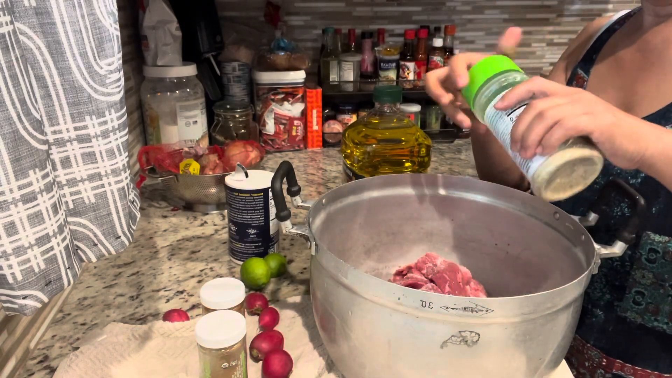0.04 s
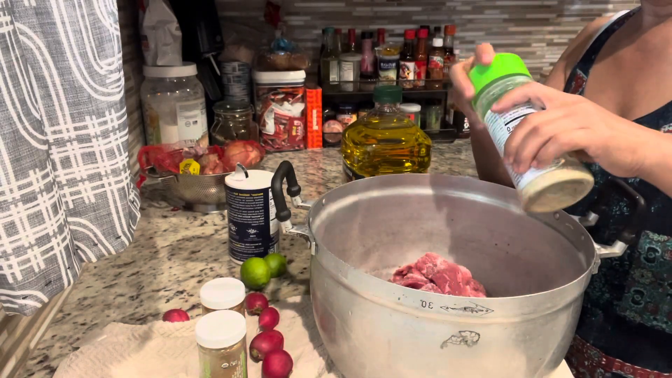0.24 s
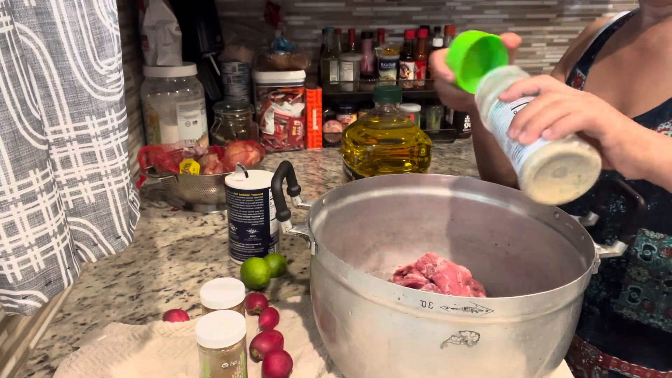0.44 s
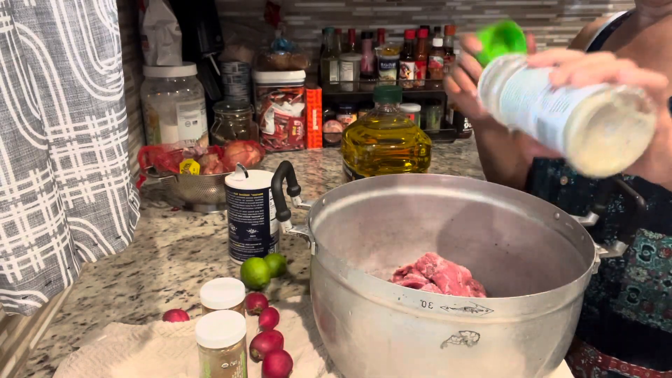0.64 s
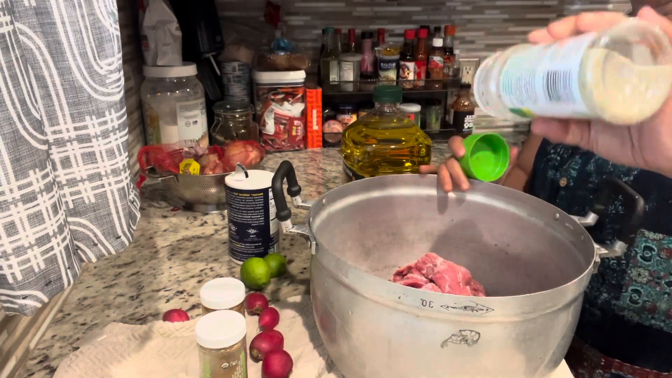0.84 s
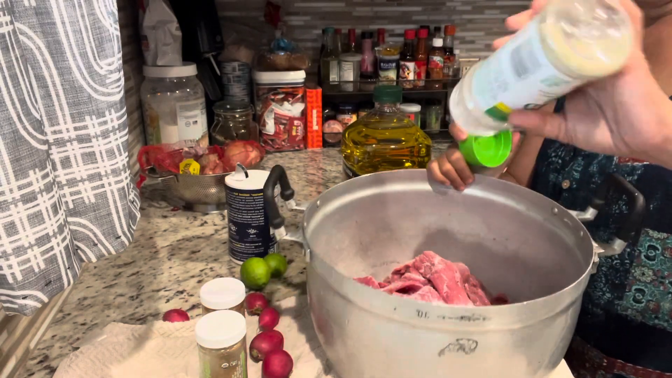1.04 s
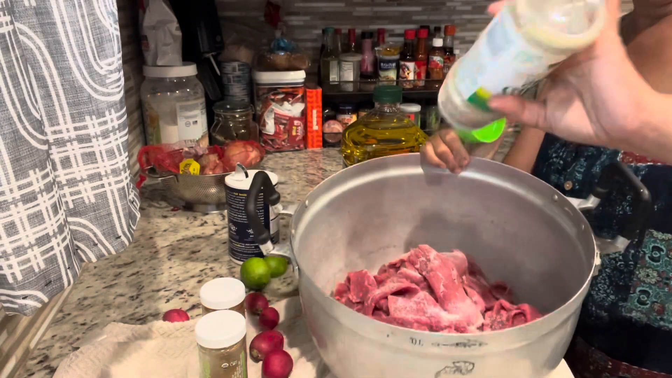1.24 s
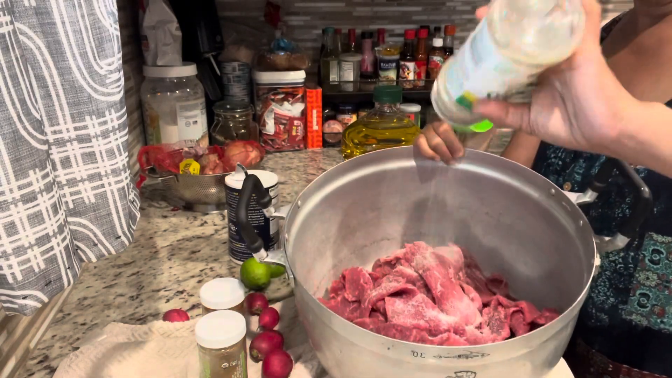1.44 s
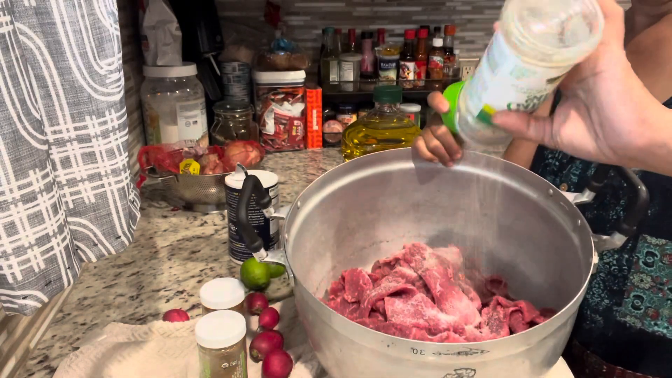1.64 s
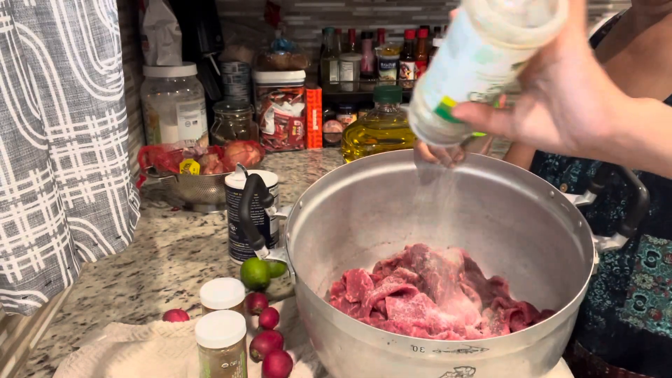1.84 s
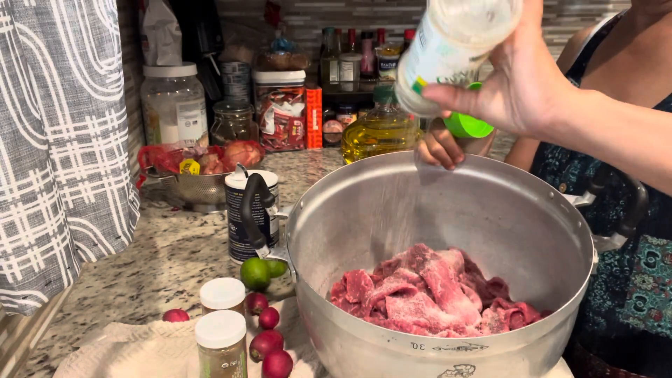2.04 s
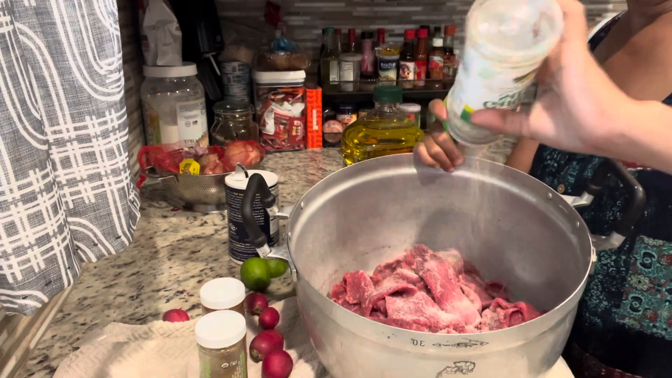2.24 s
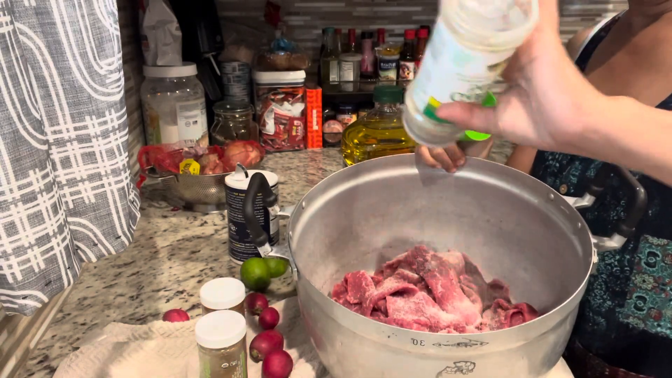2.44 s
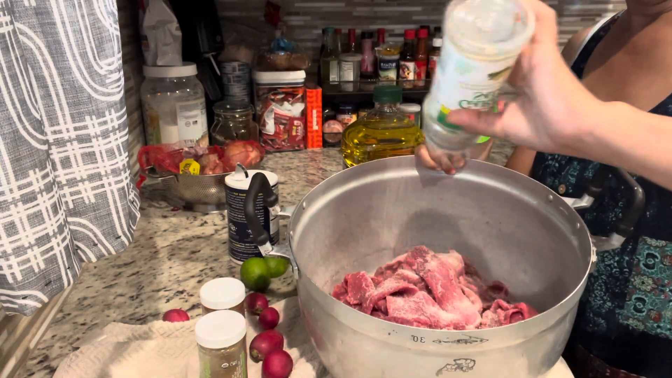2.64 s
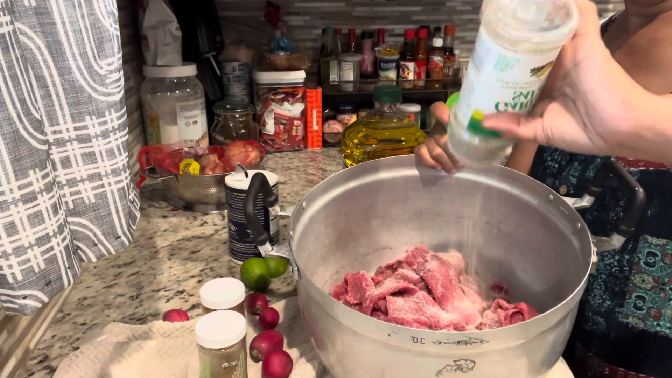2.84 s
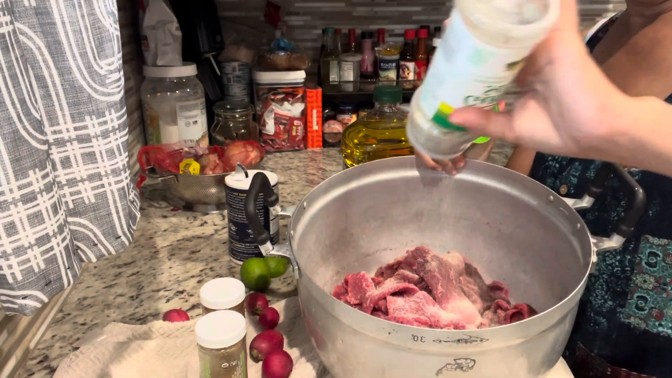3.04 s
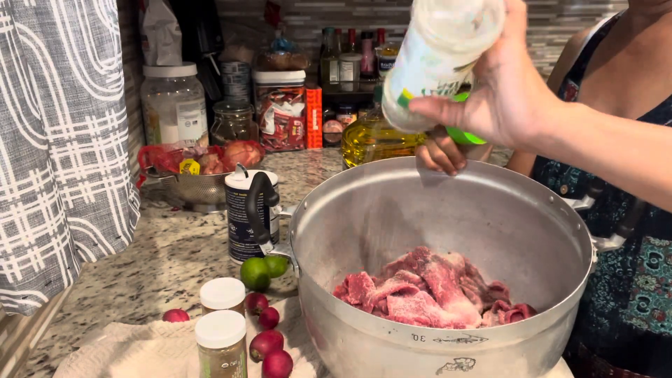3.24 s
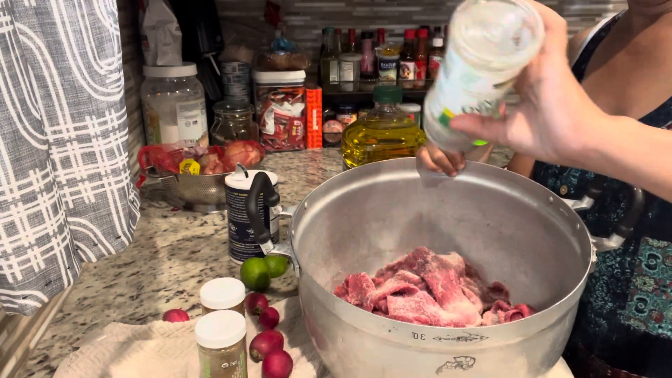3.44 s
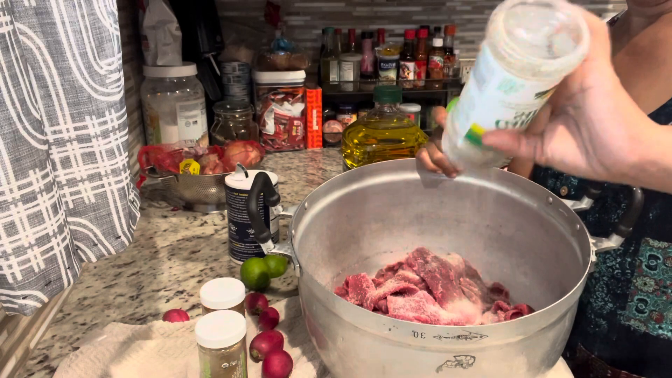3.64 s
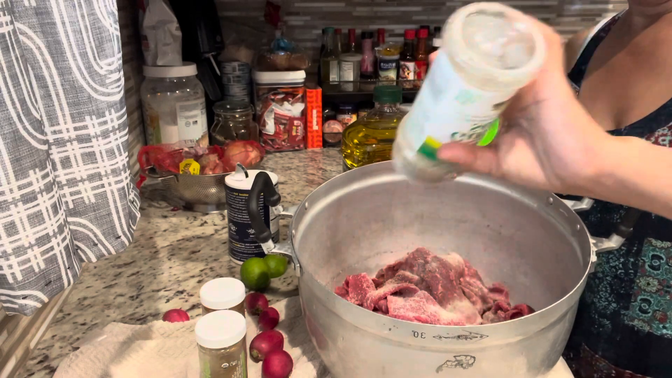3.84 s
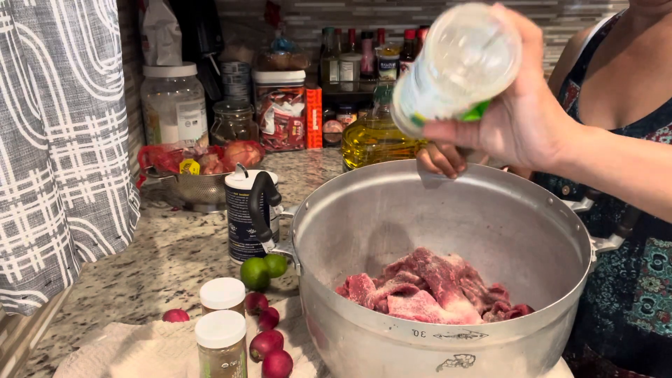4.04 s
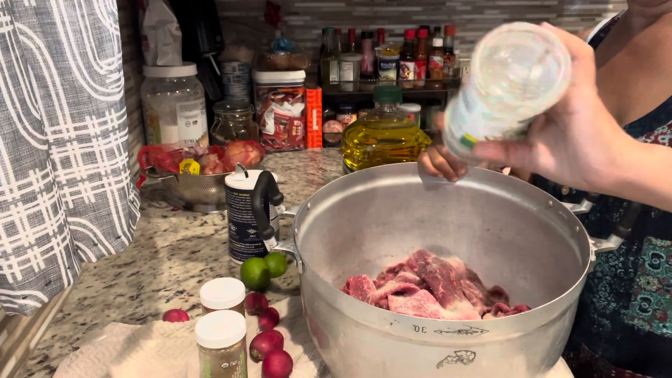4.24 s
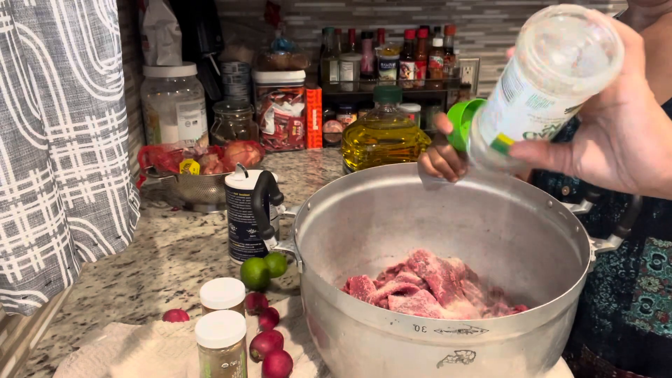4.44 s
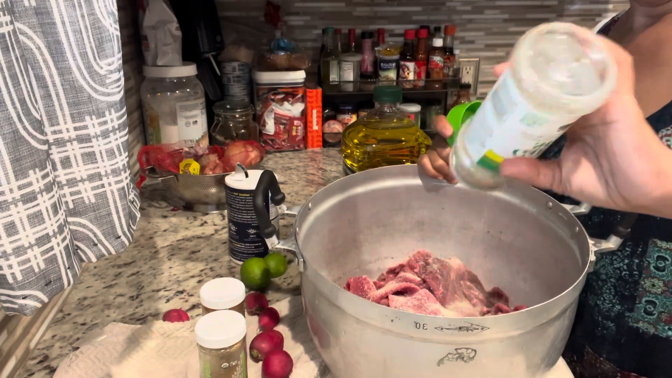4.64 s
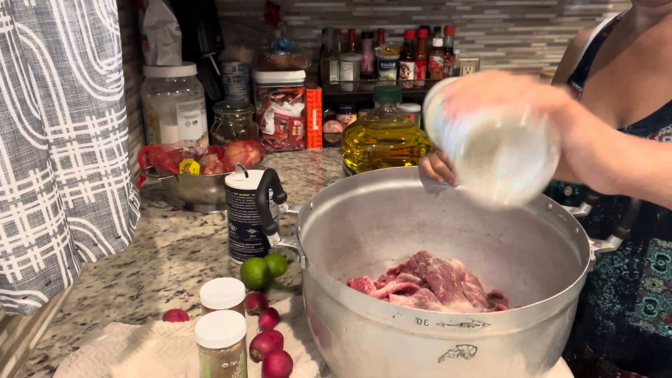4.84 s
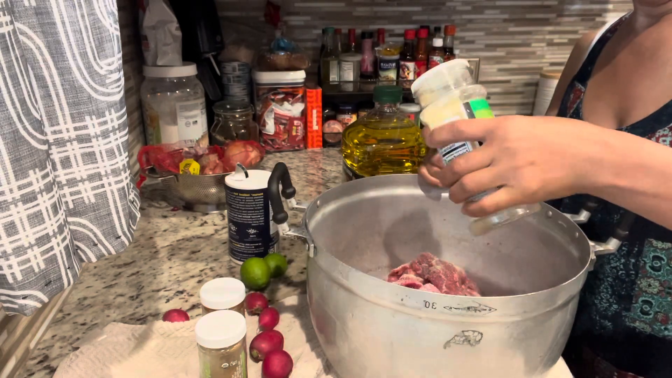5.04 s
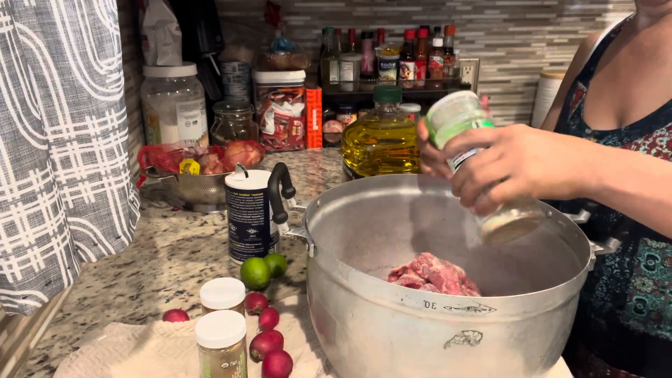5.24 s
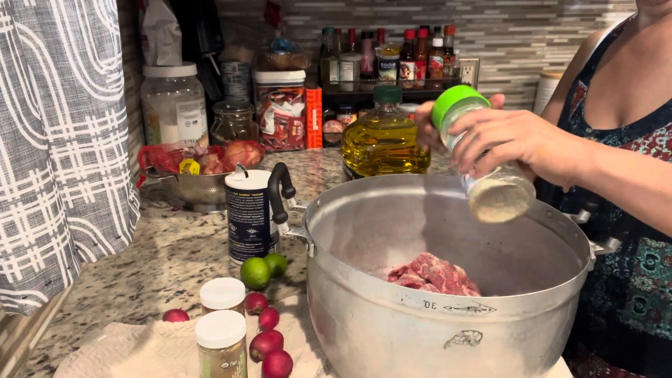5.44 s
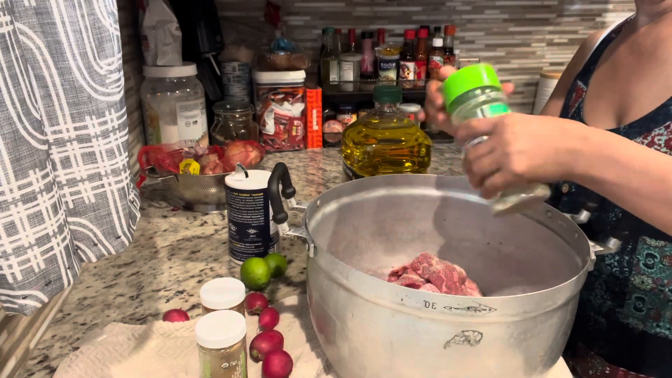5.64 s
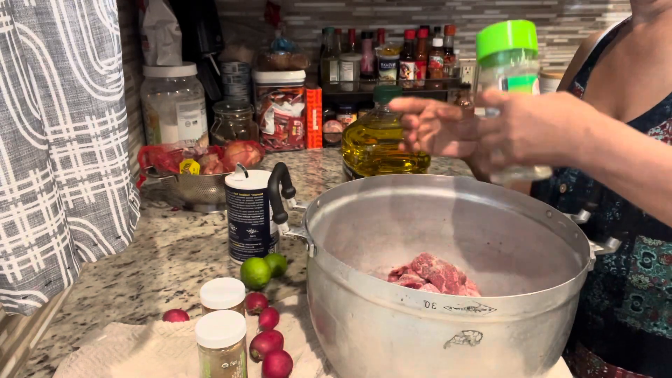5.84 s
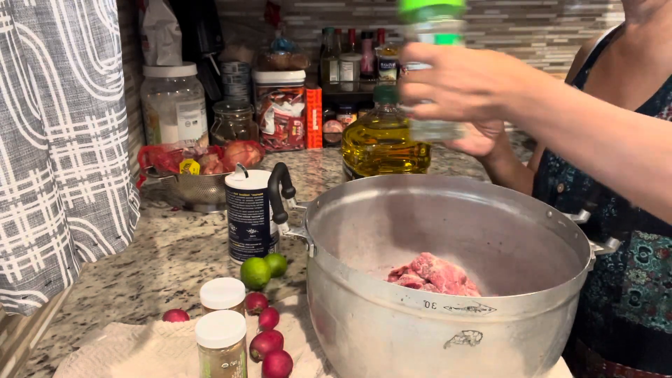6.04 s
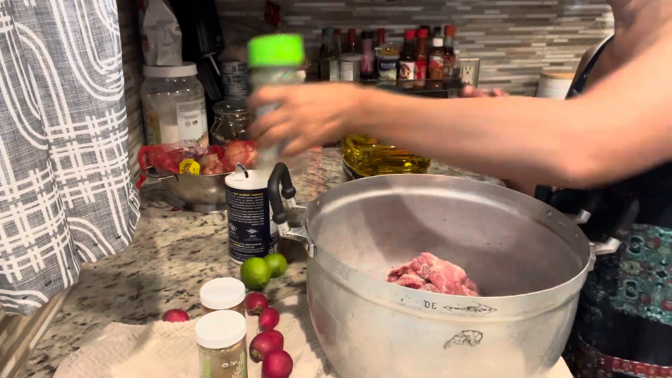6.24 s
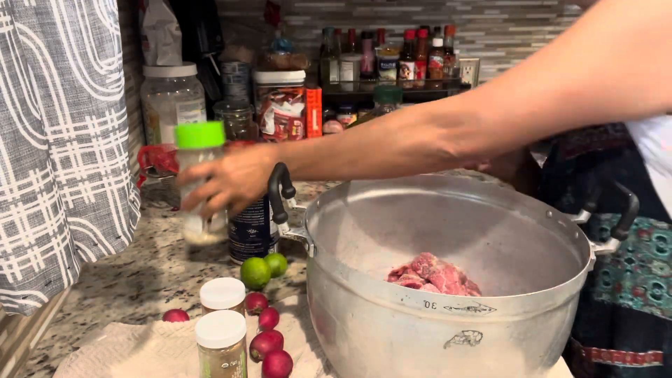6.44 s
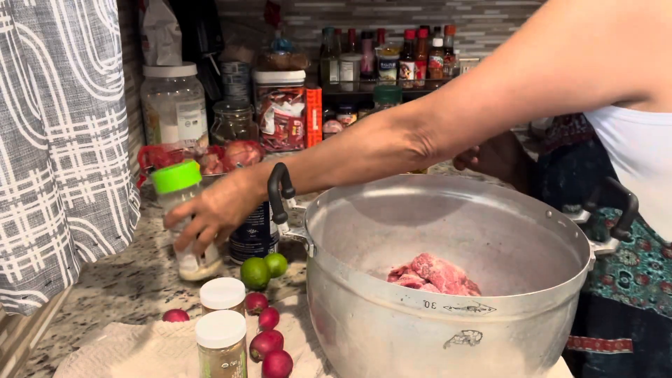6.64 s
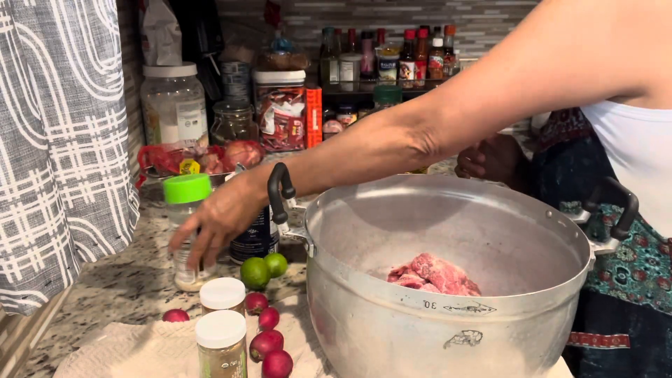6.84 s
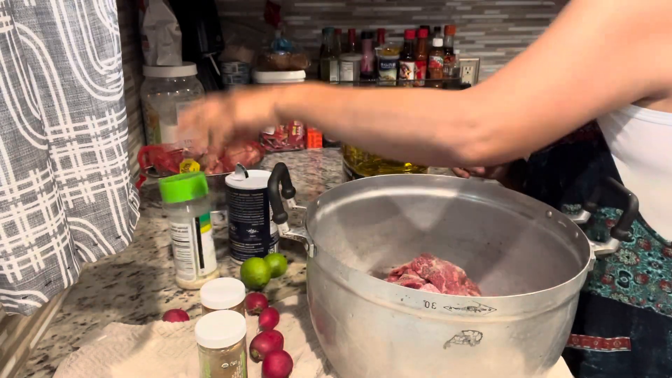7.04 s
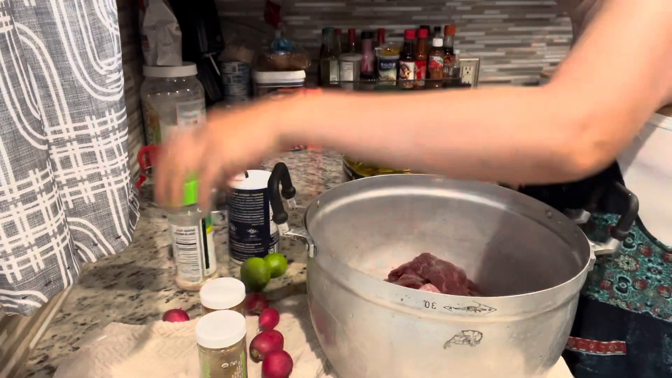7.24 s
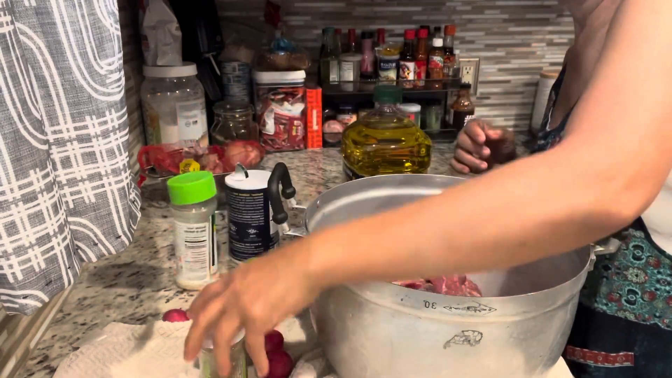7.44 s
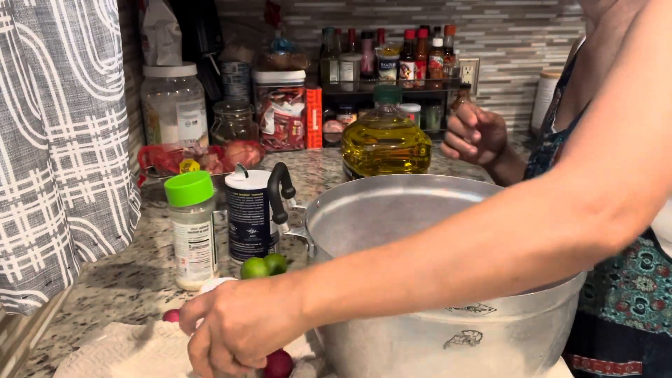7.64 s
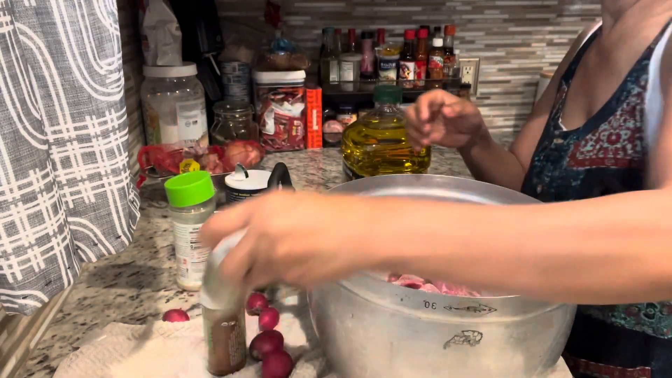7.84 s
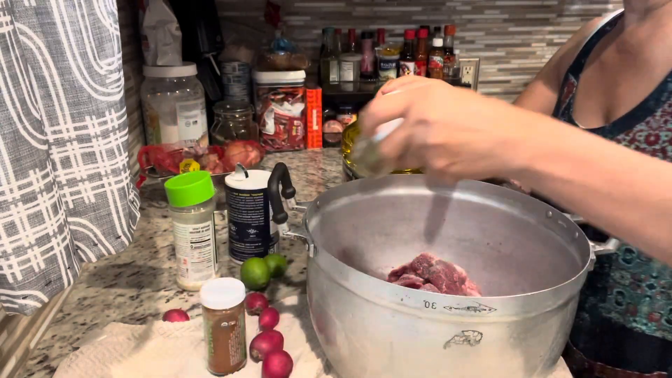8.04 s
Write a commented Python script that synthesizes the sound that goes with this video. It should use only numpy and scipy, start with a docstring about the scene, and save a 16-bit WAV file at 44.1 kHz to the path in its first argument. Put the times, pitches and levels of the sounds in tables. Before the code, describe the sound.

Close, dry stereo pickup of seasoning being shaken: a quick run of hollow plastic clicks, a swish of powder running along the bottle, several seconds of fine airy sprinkling and scattered grain ticks, then crisp clicks as the lid closes. Afterwards come soft low thumps on a padded counter, slight powder jumps and brief cloth rubs. Low, distant appliance hum and dull room murmur sit underneath in a small kitchen.

```python
"""Seasoning shaken over a pot

In a kitchen a plastic lid is unscrewed, powder is shaken over meat in a pot and the lid goes back on.
The bottle is set on a cloth-covered counter and a small jar is picked up; an appliance drones far off.
Powder is showers of random grains; lid, bottle and counter are decaying modes; cloth is resonant rubbing.
The background is a wavering sine with shaped noise, and two microphone ports pick it all up."""
import sys
import numpy as np
from scipy import signal
from scipy.fft import rfft, irfft, next_fast_len
from scipy.io import wavfile
from scipy.ndimage import uniform_filter1d

SR = 44100
rng = np.random.default_rng(int(sys.argv[2]) if len(sys.argv) > 2 else 0)


def persist_wave(psi):
    """Save psi, clipped to +-1, as 16-bit WAV."""
    counts = np.round(np.clip(psi, -1, 1) * 32767).astype(np.int16)
    wavfile.write(sys.argv[1], SR, np.atleast_2d(counts).T)


N = 357208
T = np.arange(N) / SR  # time axis, s

# random spread between blows on a mode and of the trickle; unevenness of running and rubbing grains
BLOW_SCATTER_DB, FLICKER_DB = 3, 1.8
GRIP_DETUNE = 0.04  # place and grip shift the modes from knock to knock, as a share of pitch
THUD_SPREAD_DB = 1.5  # size spread of the grains in the dull layers

# spectrum of fine powder: (f/Hz, relative level/dB)
FINE_SPECTRUM = [(3000, -35), (4500, -9), (6000, -0.5), (7400, 0), (10000, -3.5), (12500, 0), (14200, -3)]
# spectrum of powder sliding in the bottle: (f/Hz, relative level/dB)
SLIDE_SPECTRUM = [(1200, -23), (2500, -2.5), (4000, -1), (9000, -24.5)]
# spectrum of the heap's dull thud: (f/Hz, relative level/dB)
THUD_SPECTRUM = [(150, -7), (520, 6.5), (1000, -3.5), (1800, -4.5), (3000, -11.5)]
# clumps that strike the shaker holes: (t/s, peak level/dB)
CLUMPS = [(1.8236, -33.5), (2.149, -31.5), (2.249, -34), (2.2786, -30), (2.413, -23.5), (2.506, -41),
          (2.605, -25.5), (2.692, -31.5), (2.987, -31), (3.1, -39), (3.1188, -31.5), (3.258, -25),
          (3.3178, -30), (3.3963, -27), (3.421, -28), (3.4695, -37), (3.5155, -27.5), (3.532, -24.5),
          (3.5555, -33), (3.593, -32), (3.907, -33.5), (3.957, -41), (3.9737, -32), (4.1836, -30.5),
          (4.208, -31.5), (4.334, -36), (4.351, -32), (4.6805, -28.5), (4.7265, -30.5), (4.76, -32.5)]
# shakes and tilts that send the powder running: (middle t/s, half length t/s, flow level/dB)
SHAKES = [(.392, 0.034, -44.5), (.544, 0.084, -50), (.895, 0.07, -45.5), (1.129, 0.078, -34),
          (1.357, 0.13, -46), (1.51, 0.033, -42.5), (1.591, 0.053, -46.5), (1.708, 0.067, -46.5),
          (2.069, 0.042, -46), (2.152, 0.038, -53), (2.36, 0.1, -46.5), (2.66, 0.067, -57.5),
          (2.87, 0.1, -46), (3.073, 0.047, -53.5), (3.306, 0.12, -51), (3.544, 0.26, -55),
          (3.683, 0.059, -50.5), (4.005, 0.018, -46.5), (4.1, 0.079, -45.5), (4.38, 0.22, -54.5),
          (4.667, 0.1, -54.5), (4.935, 0.073, -41.5), (5.046, 0.059, -37.5), (5.164, 0.091, -41.5),
          (5.96, 0.093, -53), (6.14, 0.15, -59.5)]
# the heap thrown along the bottle: (middle t/s, slide level/dB, half length t/s, thud relative level/dB)
SURGES = [(0.963, -58.5, 0.031, 7.5), (1.163, -63, 0.062, 7.5), (1.951, -83, 0.044, 25),
          (2.862, -53, 0.019, -2.5), (3.664, -64, 0.05, -2), (4.105, -64, 0.04, -0.5),
          (4.928, -74, 0.012, 22), (5.065, -68, 0.13, 7.5), (5.066, -73, 0.03, 18.5), (5.13, -79, 0.02, 15)]
TRICKLE_S, TRICKLE_DB = (0.84, 6.41), -58.5  # grains creep while the bottle is tilted
REST_DB = -90  # flow at rest
PATTER_S, PATTER_SPREAD_DB = (1.9, 4.8), 2.5  # powder falls through the holes; size spread of its grains
CLUMP_S = 0.0018  # decay as a clump breaks up
START_STEEP, END_STEEP = 2.74, 2  # a shake sets in more abruptly than it dies away
SURGE_STEEP = 3  # both edges of a surge


def powder():
    """Dense grains hiss, small clumps patter, large ones tick; at each turn the heap surges along the wall."""
    shaken = swells(SHAKES, START_STEEP, END_STEEP)
    trickle = undb(TRICKLE_DB + BLOW_SCATTER_DB * walk(12)) * gate(TRICKLE_S, 0.58)
    flow = np.sqrt(shaken ** 2 + trickle ** 2 + undb(REST_DB) ** 2)

    hiss = level(colour(grains(7800, 0.78), FINE_SPECTRUM), -2.87) * undb(FLICKER_DB * walk(45))
    patter = level(colour(burst(grains(180, PATTER_SPREAD_DB), 0.001), FINE_SPECTRUM), -4.5)
    slide = level(colour(grains(6000, 2.1), SLIDE_SPECTRUM), 0) * undb(FLICKER_DB * walk(30))
    thud = level(colour(grains(2500, THUD_SPREAD_DB), THUD_SPECTRUM), 0) * undb(FLICKER_DB * walk(30))

    clumps = np.zeros(N)
    lead = SR // 200  # samples of room before the strike, since colouring also spreads it backwards
    for s, peak_db in CLUMPS:
        strike = 1.0 * (np.arange(2048) == lead)
        add(clumps, s - lead / SR, colour(burst(strike, CLUMP_S), FINE_SPECTRUM), peak_db)

    slide_rows = [(s, half_s, db) for s, db, half_s, _ in SURGES]
    thud_rows = [(s, half_s, db + thud_db) for s, db, half_s, thud_db in SURGES]
    surges = slide * swells(slide_rows, SURGE_STEEP, SURGE_STEEP)
    surges += thud * swells(thud_rows, SURGE_STEEP, SURGE_STEEP)
    running = hiss + gate(PATTER_S, 0.012) * patter + undb(-17.5) * slide
    return flow * running + clumps + surges


# lid and fingers on the bottle: (t/s, peak level/dB, wall relative level/dB, air relative level/dB,
# scrape length t/s, brightness/dB per octave, which also lifts or lowers the crack by as many dB)
LID_MOVES = [(0.0209, -21.5, -23.5, -35, 0.0011, -5.5), (0.078, -20.5, -28, -23.5, 0.0063, -3),
             (0.096, -27, -19, -14, 0.002, -6), (0.224, -19.5, -13.5, -23, 0.0037, -7.5),
             (0.2712, -28.5, -5.5, -13.5, 0.0011, -1.5), (0.345, -26, -20, -15, 0.015, -10.5),
             (0.371, -25.5, -22.5, -21, 0.0037, 6), (0.834, -30, -6.5, -18.5, 0.0041, -1.5),
             (5.3857, -17.5, -24, -7.5, 0.002, 8), (5.435, -21.5, -11.5, -8, 0.0016, 4.5),
             (5.485, -29, -13, -10, 0.0022, 1), (5.5328, -14, -23.5, -43, 0.0011, 1.5),
             (5.56, -34.5, -11, -20, 0.00045, -16), (5.61, -26.5, -30, -24, 0.0028, -6.5),
             (5.71, -32, -20, -26.5, 0.036, -9), (5.757, -36.5, -2.5, -3, 0.0029, 2)]
# plastic lid modes before the brightness tilt: (f/Hz, relative level/dB)
LID_MODES = [(1135, -0.5), (1490, 7.5), (1720, -2.5), (2050, 4.5), (2540, 10), (3200, 12), (3800, 6)]
# bottle wall mode: (f/Hz, relative level/dB, t60 t/s)
WALL_MODES = [(189.4, 0, 0.12)]
# mode of the air in the bottle: (f/Hz, relative level/dB, t60 t/s)
AIR_MODES = [(349, 0, 0.065)]
LID_CYCLES = 14  # periods until a lid mode has lost 60 dB
RATTLE_DB, RATTLE_S = -14.5, 0.023  # the loose lid chatters on after a slip
CRACK_DB = -3  # bright crack relative to the lid's ring
BODY_LAG_S, BODY_RISE_S = 0.00326, 0.0035  # wall and air answer late and take a moment to swing up


def lid():
    """The thread slips in a quick run of clicks that ring the lid; bottle wall and inner air answer lower."""
    track = np.zeros(N)
    t = T[:SR // 8]
    rise = 1 - np.exp(-(T[:SR // 3] / BODY_RISE_S) ** 2)
    for s, peak_db, wall_db, air_db, scrape_s, bright_db in LID_MOVES:
        # the brightness tilt pivots at 2 kHz
        modes = [(hz, db + bright_db * np.log2(hz / 2000), LID_CYCLES / hz) for hz, db in LID_MODES]
        x = t / max(scrape_s, 0.001)
        scrape = 2 * x ** 2 * np.exp(-2 * x)
        rattle = undb(RATTLE_DB) * (x > 1) * np.exp(-t / RATTLE_S)
        clicks = (rng.random(len(t)) < 4500 / SR) * rng.standard_normal(len(t))
        slips = clicks * (scrape + rattle)
        # short scrapes peak in a sharp snap, long ones creep in
        slips[int(scrape_s * SR)] = 2 * np.exp(-scrape_s / 0.0027)
        crack = signal.lfilter(*signal.butter(2, [1000, 7000], "band", fs=SR), slips)
        add(track, s, signal.fftconvolve(slips, ring(modes, detune=GRIP_DETUNE)), peak_db)
        add(track, s, crack, peak_db + CRACK_DB + bright_db)
        add(track, s + BODY_LAG_S, rise * ring(WALL_MODES), peak_db + wall_db)
        add(track, s + BODY_LAG_S, rise * ring(AIR_MODES, detune=GRIP_DETUNE), peak_db + air_db)
    return track


# bottle and jar on the counter: (t/s, peak level/dB, plastic base relative level/dB,
# jumping powder relative level/dB, ring length as a share: a hand on it shortens it)
KNOCKS = [(6.719, -28.5, -2, -17, 1), (6.851, -42.5, -11.5, -14.5, .6), (6.951, -32, -13, -11, 0.59),
          (7.073, -37, -11, -29, 1), (7.189, -47.5, -8.5, -25, .6), (7.417, -40.5, -13, -35, 0.73),
          (7.503, -41, -6.5, -29.5, 0.74), (7.648, -37, -14, -40, 0.38), (7.692, -46.5, 0, -40, 1)]
# counter modes: (f/Hz, relative level/dB, full-length t60 t/s)
COUNTER_MODES = [(64, -14, 0.3), (164.7, 3.5, 0.081), (198.8, 9.5, 0.054), (361, -1.5, 0.05)]
# plastic base modes: (f/Hz, relative level/dB, full-length t60 t/s)
BASE_MODES = [(546, 16, 0.058), (705, 8.5, 0.037), (830, 11, 0.02), (1236, -3.5, 0.034),
              (1666, -11.5, 0.084)]
SETTLE_DB, SETTLE_S = 4.5, 0.03  # fine grains falling back, relative to the jump


def knocks():
    """A soft push through cloth rings the counter; the plastic base rattles and the powder inside jumps."""
    track = np.zeros(N)
    t = T[:SR // 8]
    for s, peak_db, base_db, jump_db, length in KNOCKS:
        # the heavy counter takes a few cycles to build up
        build = (1 - np.exp(-t / 0.01)) ** 2
        add(track, s, ring(COUNTER_MODES, length, GRIP_DETUNE)[:len(t)] * build, peak_db)

        bounces = burst(1.0 * (t == 0), 0.0054) * (1 - np.exp(-t / 0.0016))
        base = signal.fftconvolve(ring(BASE_MODES, length, 2 * GRIP_DETUNE), bounces)
        add(track, s, base, peak_db + base_db)

        band = signal.butter(1, [900, 4500], "band", fs=SR)
        spray = signal.lfilter(*band, rng.standard_normal(len(t)))
        spray *= np.exp(-t / 0.019) * (1 - np.exp(-t / 0.0011))
        add(track, s, spray, peak_db + jump_db)

        settling = colour(rng.standard_normal(len(t)), FINE_SPECTRUM) * np.exp(-t / SETTLE_S)
        add(track, s, settling, peak_db + jump_db + SETTLE_DB)
    return track


# a hand or a base brushing over cloth: (middle t/s, half length t/s, hiss level/dB, low drag level/dB)
BRUSHES = [(6.616, 0.1, -61, -73), (6.876, 0.043, -65.5, -65.5), (7.316, 0.065, -99.5, -74.5),
           (7.58, 0.083, -68, -69.5), (7.797, 0.15, -77.5, -81)]
# resonances of the rubbing: (f/Hz, width f/Hz, relative level/dB)
BRUSH_PEAKS = [(1700, 230, -9.5), (2840, 3000, -4), (5400, 870, -2.5), (12100, 7300, -9)]
DRAG_HZ = (166.3, 830)  # band of the low dragging
BRUSH_STEEP = 4, 3  # a brush starts and stops firmly


def brush():
    """Rubbing grains pass through a few resonances that each flicker; the base drags below them."""
    hiss = np.zeros(N)
    for hz, width_hz, db in BRUSH_PEAKS:
        peak = signal.lfilter(*signal.iirpeak(hz, hz / width_hz, SR), grains(4000, 0.83))
        hiss += undb(db + 2 * FLICKER_DB * walk(25)) * level(peak, 0)
    low_band = signal.butter(2, DRAG_HZ, "band", fs=SR)
    drag = level(signal.lfilter(*low_band, grains(600, THUD_SPREAD_DB)), 0)
    hiss *= swells([row[:3] for row in BRUSHES], *BRUSH_STEEP)
    drag *= swells([(s, half_s, db) for s, half_s, _, db in BRUSHES], *BRUSH_STEEP)
    return hiss + drag


# background fader moves: (t/s, drone level/dB, room murmur level/dB)
KITCHEN_LEVELS = [(0, -54, -51), (1.0, -52, -64), (2.9, -50, -65), (3.2, -58, -68), (4.3, -51.5, -71.5),
                  (5.8, -58, -71), (6.4, -60.5, -75), (7.7, -55, -75.5), (7.95, -64, -76)]
# rumble spectrum: (f/Hz, relative level/dB)
RUMBLE_SPECTRUM = [(25, -39), (55, 19.5), (80, 7), (142, 10), (200, -37.5)]
# room murmur spectrum: (f/Hz, relative level/dB)
MURMUR_SPECTRUM = [(150, -5), (330, -6.5), (620, -14.5), (1000, -13), (1400, -20.5), (6000, -33)]
DRONE_HZ, DRONE_WIDTH_HZ = 77.94, 2.02  # centre pitch and typical wander


def kitchen():
    """A drone wavers near one pitch over low rumble noise and a dull, wide murmur of the room."""
    drone_gain, murmur_gain = curves(KITCHEN_LEVELS)
    cycles = np.cumsum(DRONE_HZ + DRONE_WIDTH_HZ * walk(4.4)) / SR
    drone = np.sqrt(2) * np.sin(2 * np.pi * cycles) * undb(2.3 * walk(16)) * drone_gain
    # the rumble follows the drone only in part
    rumble = level(colour(rng.standard_normal(N), RUMBLE_SPECTRUM), -33.0) * drone_gain ** 0.49
    common, left, right = rng.standard_normal((3, N))
    wide = common + 3.05 * np.array([left, right])
    murmur = level(colour(wide, MURMUR_SPECTRUM), 0.24) * murmur_gain
    return (drone + rumble) * undb([[1.6], [-1.6]]) + murmur * undb([[1.1], [-1.1]])


def undb(db):
    """Decibels to gain."""
    return 10 ** (np.asarray(db) / 20)


def level(x, db):
    """Scale to an rms level in dB."""
    return x * undb(db) / np.sqrt(np.mean(x ** 2))


def colour(x, points):
    """Shape a spectrum by (Hz, dB) points on a log pitch axis, with -80 dB below the first."""
    hz, db = np.transpose(points)
    size = next_fast_len(x.shape[-1])
    log_f = np.log(np.maximum(np.fft.rfftfreq(size, 1 / SR), 1))
    gain = undb(np.interp(log_f, np.log(hz), db, left=-80))
    return irfft(rfft(x, size) * gain, size)[..., :x.shape[-1]]


def walk(rate):
    """Random levels, a new one each 1 / rate s, slewed from one to the next; spread near 1."""
    k = int(SR / rate)
    steps = np.repeat(rng.standard_normal(N // k + 1), k)
    return np.sqrt(3 / 2) * uniform_filter1d(steps, k)[:N]


def curves(table):
    """Table columns after the first as gains over time."""
    s, *columns = np.transpose(table)
    return [undb(np.interp(T, s, c)) for c in columns]


def swells(rows, start_steep, end_steep):
    """Gain of movements that rise to a middle and die away, 1/e at the half length; their powers add."""
    t = T[::32]  # a coarse time grid is enough
    s, half_s, db = np.transpose(rows)[:, :, None]
    steep = np.where(t < s, start_steep, end_steep)
    power = undb(2 * db) * np.exp(-2 * np.abs((t - s) / half_s) ** steep)
    return np.interp(T, t, np.sqrt(power.sum(0)))


def gate(span, edge_s):
    """1 inside a time span, with soft edges."""
    return np.clip(np.minimum(T - span[0], span[1] - T) / edge_s, 0, 1)


def grains(per_s, spread_db):
    """Single particles at random moments with a long tail of sizes."""
    hit = rng.random(N) < per_s / SR
    return hit * rng.standard_normal(N) * undb(spread_db * rng.exponential(size=N))


def burst(x, decay_s):
    """Each impulse becomes a click with a short decaying spray of noise."""
    envelope = signal.lfilter([1], [1, -np.exp(-1 / (decay_s * SR))], np.abs(x))
    return envelope * rng.standard_normal(len(x)) + 1.2 * x


def ring(modes, length=1, detune=0.0077):
    """One blow's response: decaying modes, each excited and tuned a little differently."""
    t = T[:SR // 3]
    hz, db, t60 = np.transpose(modes)[:, :, None]
    louder, sharper = rng.standard_normal((2, len(modes), 1))
    decay = undb(db + BLOW_SCATTER_DB * louder - 60 * t / (length * t60))
    return np.sum(decay * np.sin(2 * np.pi * hz * (1 + detune * sharper) * t), 0)


def add(track, s, sound, peak_db):
    """Place a sound at a time with a given peak."""
    i = int(s * SR)
    sound = sound[:N - i]
    track[i:i + len(sound)] += sound * undb(peak_db) / np.max(np.abs(sound))


def room(x, wet_db, t60_s):
    """Two unrelated noise tails, duller in the treble."""
    t = T[:SR // 2]
    noise = rng.standard_normal((2, len(t)))
    tail = colour(noise, [(60, -4.5), (3000, -7.0), (15000, -12.0)]) * undb(-60 * t / t60_s)
    tail *= np.minimum(t / 0.0019, 1)
    tail /= np.sqrt(np.sum(tail ** 2, 1, keepdims=True))
    return undb(wet_db) * signal.fftconvolve(x[None], tail, axes=1)[:, :N]


SWAY_HZ = 1.3  # the hands never keep still, so the room's answer keeps changing


def place(x, pan_db, wet_db, t60_s):
    """Direct sound panned between the channels, plus two room answers that trade places."""
    sway = 2 * np.pi * SWAY_HZ * T
    direct = x * undb([[pan_db / 2], [-pan_db / 2]])
    return direct + room(x * np.cos(sway), wet_db, t60_s) + room(x * np.sin(sway), wet_db, t60_s)


def scene():
    """Hand sounds, each with its own pan and room, over the kitchen background."""
    hands = place(powder(), pan_db=1.0, wet_db=-5.0, t60_s=0.055)
    hands += place(lid(), pan_db=3, wet_db=-9, t60_s=0.33)
    hands += place(knocks(), pan_db=5, wet_db=-6.0, t60_s=0.34)
    hands += place(brush(), pan_db=2.5, wet_db=-3, t60_s=0.11)
    return hands + kitchen()


# phase between the two microphone ports: (f/Hz, left port's lead/radians)
PORT_PHASE = [(100, 0.44), (3700, 1), (5000, -0.36), (7150, -2.5), (10400, -5.5), (14600, -8.5)]
TOP_HZ = 14600  # upper edge of the pickup


def record(dry):
    """Two ports hear each band with a phase lag between them; the top is cut steeply."""
    hz, lead = np.transpose(PORT_PHASE)
    log_f = np.log(np.fft.rfftfreq(N, 1 / SR) + 1)
    turn = np.interp(log_f, np.log(hz), lead) / 2  # each port takes half the lead
    ports = irfft(rfft(dry) * np.exp(1j * np.array([turn, -turn])), N)
    return signal.sosfilt(signal.ellip(8, 0.2, 60, TOP_HZ, fs=SR, output="sos"), ports)


dry = scene()
out = record(dry)
persist_wave(out)
```